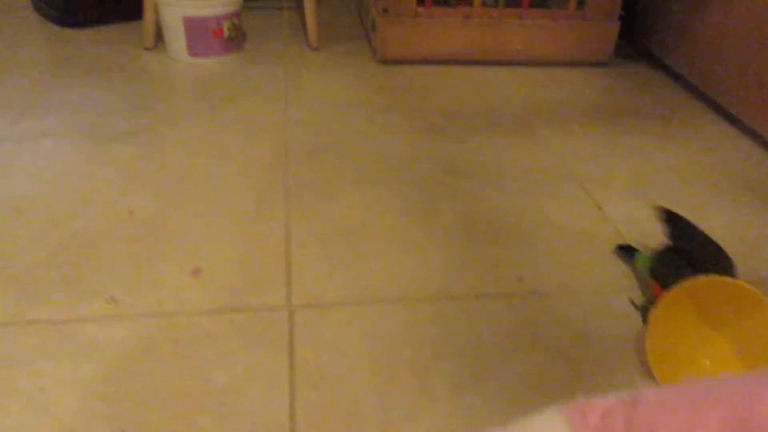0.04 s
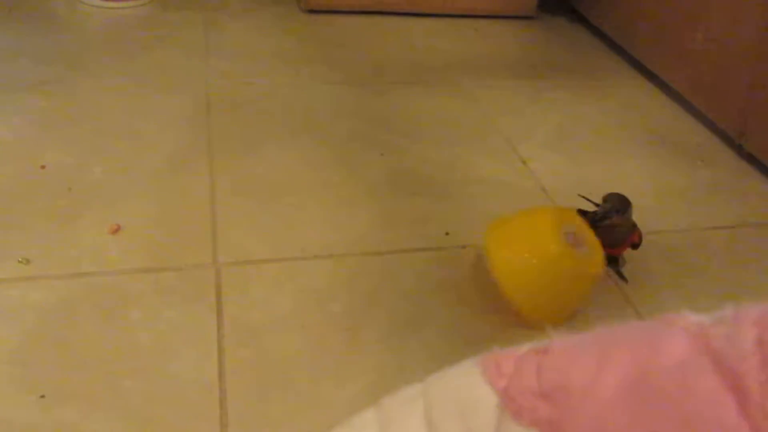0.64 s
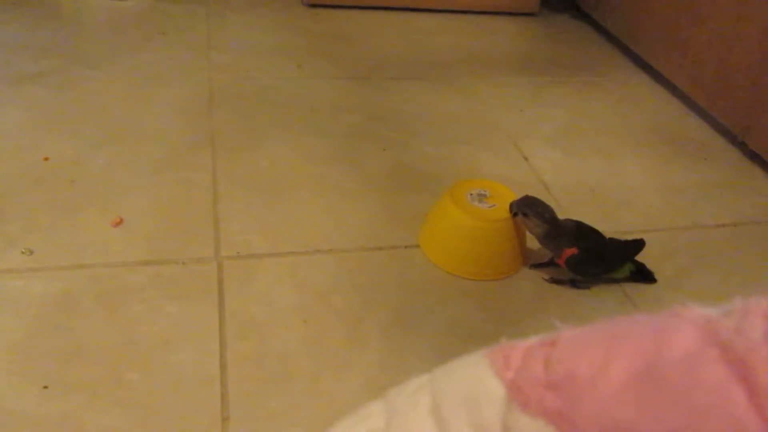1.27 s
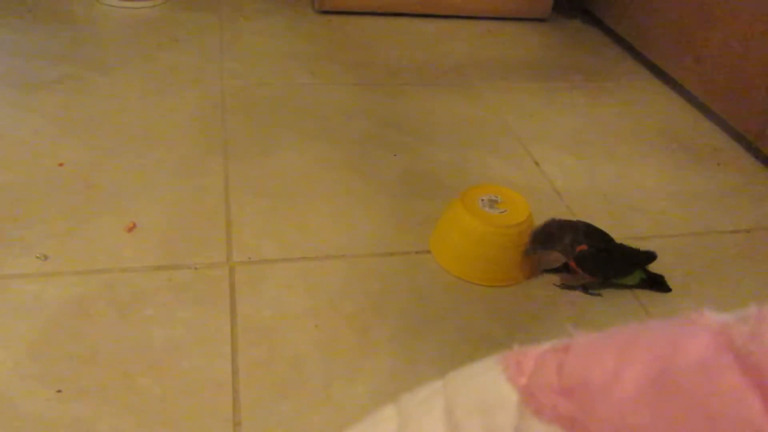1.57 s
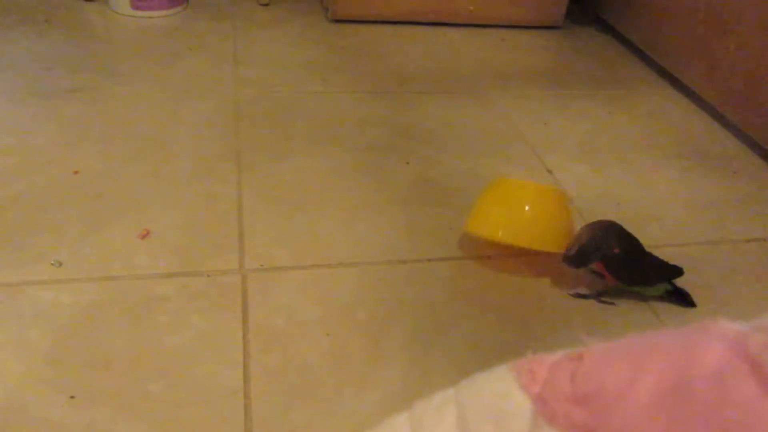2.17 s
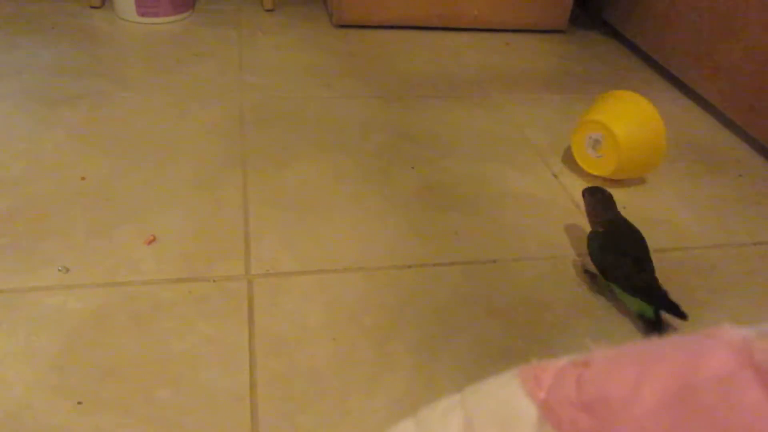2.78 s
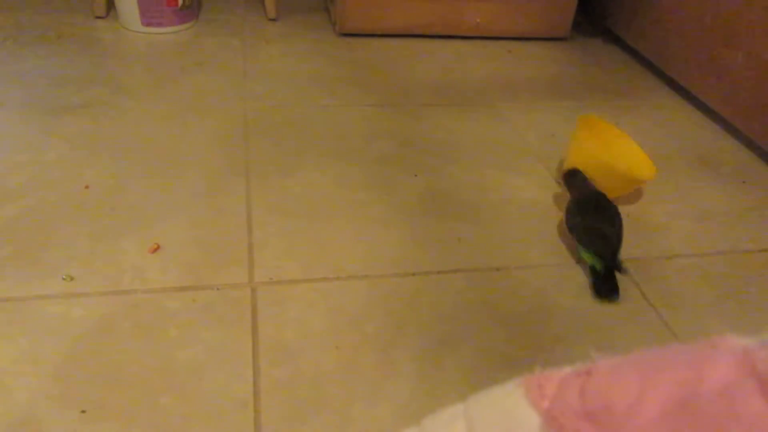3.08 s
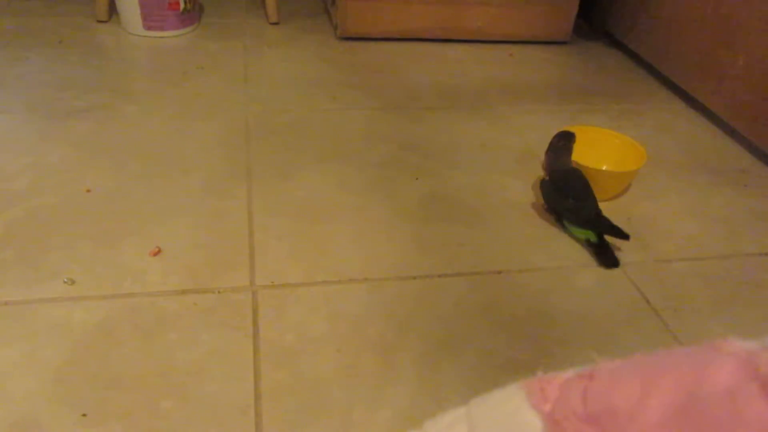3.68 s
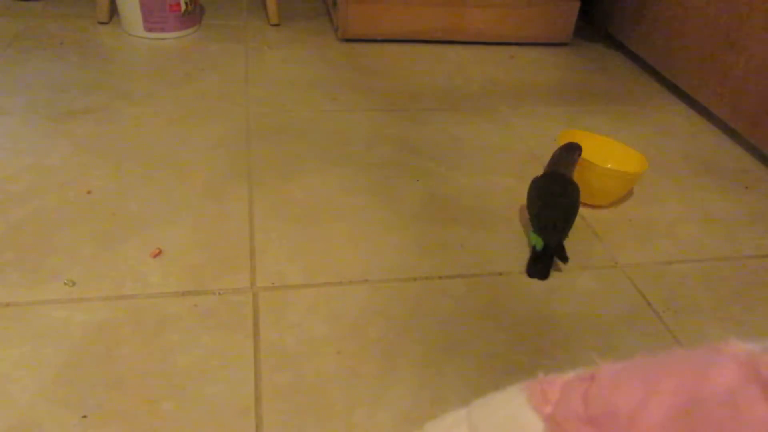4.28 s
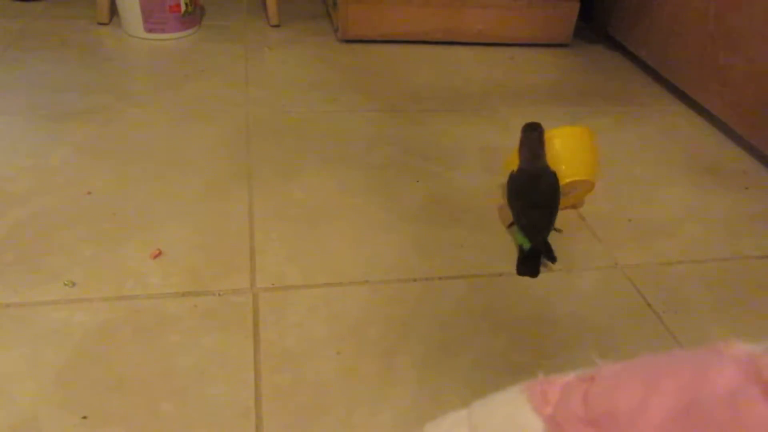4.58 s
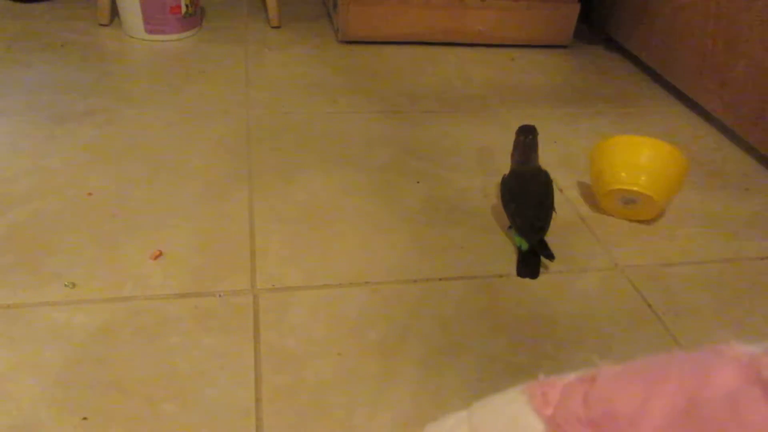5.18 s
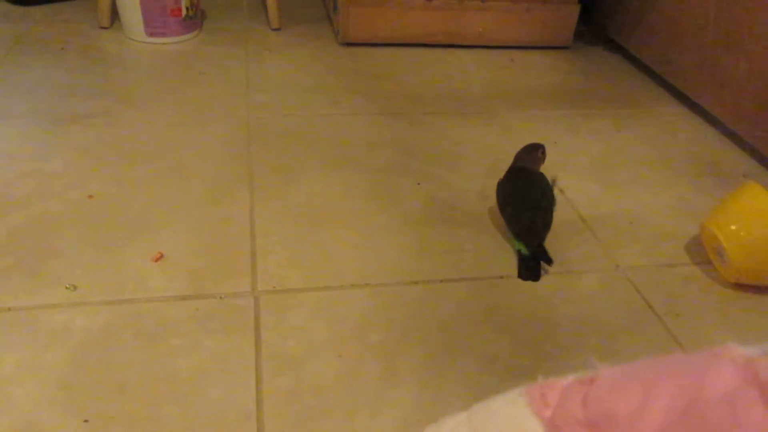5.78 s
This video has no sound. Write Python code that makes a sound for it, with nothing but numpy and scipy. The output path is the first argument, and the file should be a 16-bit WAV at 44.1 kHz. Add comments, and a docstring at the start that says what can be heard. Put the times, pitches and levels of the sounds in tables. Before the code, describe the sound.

Hollow plastic knocks, rattles and short scrapes as a bowl is shoved and flipped across tiles indoors.

```python
"""A small room with a tiled floor: a parrot shoves and flips a plastic bowl, a metre or two away.
Each knock sounds the hollow (low rim down, higher with the mouth open), rings the thin wall and
clicks on the tile. Between knocks the bowl slides, scuffs and ticks. The room adds a short echo
and a low hush; the hardest knocks overload a small microphone."""
import sys
import numpy as np
from scipy import signal
from scipy.fft import rfft, irfft
from scipy.io import wavfile
from scipy.ndimage import uniform_filter1d

SR = 44100
rng = np.random.default_rng(int(sys.argv[2]) if len(sys.argv) > 2 else 0)


def inscribe(sig):
    """Save sig as 16-bit PCM at rate SR to the path in sys.argv[1].

    A 1-D sig is mono; a 2-D sig holds one channel per row.
    Samples are clipped to [-1, 1] before scaling.
    """
    pcm = np.round(np.clip(np.atleast_2d(sig).T, -1, 1) * 32767)
    wavfile.write(sys.argv[1], SR, pcm.astype(np.int16))


N = 266231
TIME_S = np.arange(N) / SR
AGE_S = np.arange(int(.12 * SR)) / SR   # time since a blow
FALLS_S, FLIPPED_S = .75, 2.15   # bowl on its side, then rim down, then mouth up
MODE_SPREAD_DB = 2.5   # mode strength varies with the spot struck

# Slow wall bending. Each row: frequency in Hz, level mouth open in dB, level rim down in dB, t60 in s.
FLEX_MODES = [(1153, 12.5, 2, 0.023), (1282, 10, 3, 0.018), (1400, 4.5, -8.5, 0.022),
              (1620, -27, -15, 0.079), (1770, -34, 2, 0.055), (1847, -5.5, 1, 0.032),
              (2020, -15, -5, 0.047)]
# Fast modes of wall and rim. Each row: as in FLEX_MODES.
RING_MODES = [(2470, -24, 3.5, 0.035), (2414, -1.5, -4.5, 0.015), (2748, -5, 4.5, 0.031),
              (2948, 1, 6.5, 0.024), (3108, 0.5, -7, 0.033), (3294, -1.5, -9, 0.019),
              (3490, -2, -10, 0.013), (3690, -20, -22.5, 0.055), (4180, -10, -10, 0.034),
              (4350, -30, -29, 0.02)]
# Hard plastic touching tile. Each row: frequency in Hz, relative density in dB.
CLICK_SPECTRUM = [(300, -17), (1500, -9), (2500, -4.5), (4500, -5.5), (5800, 0.5), (7000, -3), (8400, -3.5),
                  (9700, -9), (12000, -9), (15500, -14)]


def from_db(db):
    """Decibels to gain."""
    return 10 ** (np.asarray(db) / 20)


def rms_one(x):
    """Scale to rms 1."""
    return x / np.sqrt(np.mean(x ** 2) + 1e-20)


def attack_one(x):
    """Scale to rms 1 over the first 5 ms."""
    return x / np.sqrt(np.mean(x[:int(.005 * SR)] ** 2) + 1e-20)


def gain_curve(points):
    """Gain per sample from (s, dB) points."""
    return from_db(np.interp(TIME_S, *np.transpose(points)))


def at_hz(points, hz):
    """Read a table on a log-frequency axis."""
    point_hz, value = np.transpose(points)
    return np.interp(np.log(np.maximum(hz, 1)), np.log(point_hz), value)


def band(x, low_hz, high_hz):
    """Causal band-pass."""
    return signal.sosfilt(signal.butter(2, [low_hz, high_hz], "band", fs=SR, output="sos"), x)


def low_cut(x, hz, order=2):
    """Causal high-pass."""
    return signal.sosfilt(signal.butter(order, hz, "high", fs=SR, output="sos"), x)


def high_cut(x, hz, order=6):
    """Causal low-pass."""
    return signal.sosfilt(signal.butter(order, hz, fs=SR, output="sos"), x)


def coloured_noise(spectrum):
    """Steady noise of a given spectrum, rms 1."""
    hz = np.arange(N // 2 + 1) * SR / N
    return rms_one(irfft(rfft(rng.standard_normal(N)) * from_db(at_hz(spectrum, hz)), N))


def add(out, start_s, sound):
    """Mix a sound in at start_s."""
    at = int(start_s * SR)
    out[at:at + len(sound)] += sound[:N - at]


def hush():
    """Low background noise; sinks at the loudest knocks and creeps back."""
    # Each row: frequency in Hz, relative density in dB.
    spectrum = [(15, -55), (25, -9.5), (81, -9), (109, -9), (231, 1), (344, -1), (415, -1.5), (604, 0),
                (691, -7.5), (856, -3.5), (927, -10.5), (1580, -15), (3350, -25.5), (9520, -34.5),
                (15000, -45)]
    # Each row: time in seconds, level in dB.
    levels = [(0, -43), (.75, -41.5), (.79, -58), (1.35, -51.5), (2.48, -46), (2.52, -49.5), (3.2, -47),
              (3.25, -53), (3.9, -49.5), (4.8, -45.5), (5.5, -42.5), (6.04, -41)]
    return gain_curve(levels) * coloured_noise(spectrum)


def room_echo(x, first_echo_s=.0028, build_s=.0025, early_db=3, early_s=.0057):
    """Strong early echoes off floor and cupboard, then a dense tail whose treble dies first."""
    # Room decay. Each row: frequency in Hz, t60 in seconds.
    decay = [(200, 0.53), (600, 0.51), (1000, 0.48), (3000, 0.43), (6000, 0.24), (14000, 0.27)]
    # Echo colour. Each row: frequency in Hz, gain in dB.
    colour = [(150, -3), (500, 0), (850, 0.5), (1300, -2.5), (3000, 1), (6000, -5), (9000, -5), (15000, -9)]
    # Echo level over time; the loudest knocks sound driest. Each row: time in seconds, send in dB.
    send = [(0, -9.5), (.7, -5), (.76, -15), (1.1, -5), (2.2, -5.5), (2.5, -8.5), (2.65, -8.5), (3.25, -9),
            (3.7, -7.5), (6, -7)]
    t = np.arange(int(.6 * SR)) / SR
    edges_hz = np.geomspace(100, 16000, 12)
    onset = 1 - np.exp(-np.maximum(t - first_echo_s, 0) / build_s)
    response = np.zeros(len(t))
    for low, high in zip(edges_hz, edges_hz[1:]):
        hz = np.sqrt(low * high)
        tail = band(rng.standard_normal(len(t)), low, high) * onset * from_db(-60 * t / at_hz(decay, hz))
        unity_rms = np.sqrt(2 * (high - low) / SR / len(t))
        response += rms_one(tail) * unity_rms * from_db(at_hz(colour, hz))
    response *= 1 + from_db(early_db) * np.exp(-t / early_s)
    return signal.fftconvolve(x * gain_curve(send), response)[:N]


def wall_modes(modes, rim_down, detune=.013):
    """One blow on the wall: the spot struck sets each mode's strength, the tile shifts its pitch."""
    hz, open_db, down_db, t60_s = np.transpose(modes)[:, :, None]
    strength, shift, side = rng.standard_normal((3, len(modes), 1))
    level_db = (down_db if rim_down else open_db) + MODE_SPREAD_DB * strength
    envelope = np.sign(side) * from_db(level_db - 60 * AGE_S / t60_s)
    return attack_one(np.sum(envelope * np.sin(2 * np.pi * hz * (1 + detune * shift) * AGE_S), axis=0))


def crack(low_hz, high_hz, t60_s):
    """Many overdamped modes of the plastic: a brief noise burst."""
    burst = rng.standard_normal(len(AGE_S)) * from_db(-60 * AGE_S / t60_s)
    return attack_one(band(burst, low_hz, high_hz))


def shell(rim_down, flex_db, ring_db):
    """The struck thin wall bends slowly and rings fast."""
    low_hz, high_hz = (650, 2480) if rim_down else (700, 1780)
    flex = wall_modes(FLEX_MODES, rim_down) + 1.18 * crack(735, 2000, t60_s=.022)
    flex = high_cut(low_cut(flex, low_hz), high_hz)
    ring = wall_modes(RING_MODES, rim_down) + .65 * crack(2680, 4060, t60_s=.028)
    return from_db(flex_db) * attack_one(flex) + from_db(ring_db) * attack_one(band(ring, 1670, 12000))


def open_hollow(hz, t60_s, reach_octaves=.46, detune=.027):
    """Mouth open, a blow starts all base modes in step, strongest near hz."""
    # Modes of base and hollow. Each row: frequency in Hz, level in dB, ring time as a multiple of t60_s.
    modes = [(334, -12.5, 0.45), (430, -11, 0.2), (516.95, 1, 0.93), (598.4, 6, 1.56), (684, 0, 1),
             (812, 5.5, 0.67), (927, 4.5, 1.4), (982, -2.5, 1.24), (1145, -1.5, 2.1)]
    mode_hz, level_db, t60_ratio = np.transpose(modes)[:, :, None]
    strength, shift = rng.standard_normal((2, len(modes), 1))
    distance = np.log2(mode_hz / hz) / reach_octaves
    weight = from_db(level_db + MODE_SPREAD_DB * strength) / (1 + distance ** 2) ** 2
    envelope = weight * from_db(-60 * AGE_S / (t60_s * t60_ratio))
    rings = envelope * np.sin(2 * np.pi * mode_hz * (1 + detune * shift) * AGE_S)
    return attack_one(band(rings.sum(axis=0), .53 * hz, 1800))


def trapped_air(hz, t60_s, rise_s=.0009, glide=.026, glide_s=.0051):
    """Rim down, the air under the bowl rings like a drum; the changing rim gap bends its pitch."""
    pitch_hz = hz * (1 + glide * (2 * np.exp(-AGE_S / glide_s) - 1))
    envelope = from_db(-60 * AGE_S / t60_s) * (1 - np.exp(-AGE_S / rise_s))
    ring = attack_one(envelope * np.sin(2 * np.pi * np.cumsum(pitch_hz) / SR))
    thud = .22 * crack(.95 * hz, 1.7 * hz, t60_s=.014)
    return attack_one(low_cut(ring + thud, hz=290))   # a small body radiates little bass


def tile_click(grain, start_s, click_db, wall_db, edge_hz=11000, db_per_octave=22):
    """Plastic meets tile; a hard touch, where the click outweighs the wall, is brighter."""
    cut_hz = np.clip(edge_hz * 2 ** ((click_db - wall_db) / db_per_octave), 3500, 16000)
    envelope = from_db(-60 * AGE_S / .006) + .27 * from_db(-60 * AGE_S / .044)
    burst = grain[int(start_s * SR):][:len(AGE_S)] * envelope
    return from_db(click_db) * attack_one(high_cut(burst, cut_hz, order=2))


def scuffs():
    """The rim scuffs the tile: brief swells of friction hiss."""
    # Each row: start in seconds, length in seconds, level in dB, centre in Hz, width in octaves.
    swells = [(0.076, 0.027, -48.5, 10900, 0.82), (0.109, 0.046, -47, 3260, 0.32),
              (0.219, 0.08, -42.5, 3280, 0.31), (0.259, 0.044, -36, 3630, 0.7), (.262, 0.061, -49, 6900, 1),
              (0.4, .02, -55, 8000, 0.98), (1.865, 0.044, -65, 7350, 0.56),
              (2.475, 0.0086, -39, 8000, 0.83), (2.715, .02, -38.5, 7514, 0.73),
              (2.927, 0.022, -43.5, 4000, 1.43), (4.962, 0.024, -46.5, 5936, 0.73)]
    out = np.zeros(N)
    for start_s, length_s, level_db, hz, octaves in swells:
        size, edge_ratio = int(length_s * SR), 2 ** (octaves / 2)
        hiss = rms_one(band(rng.standard_normal(size), hz / edge_ratio, hz * edge_ratio))
        envelope = np.sin(np.pi * np.linspace(0, 1, size) ** .35)
        add(out, start_s, from_db(level_db) * hiss * envelope)
    return out


def slides(catches_per_s=3500, spread_db=3.5, flex_db=-2, speed_power=1.27):
    """The rim catches on the tile's grain; tiny slips ring wall and base, and hiss."""
    # Each row: start, fastest moment and stop in seconds, then base, wall and grit at top speed in dB.
    shoves = [(-.1, .01, 0.26, -57, -48.5, -63), (.17, 0.268, 0.31, -60, -60, -51.5),
              (.27, 0.372, .66, -44.5, -53, -61), (.42, .68, 0.86, -50, -65, -70),
              (2, 2.157, 2.264, -40, -51, -61), (2.8, 2.871, 3, -65, -55, -60),
              (2.97, 3.036, 3.19, -37.5, -49.5, -70), (3.138, 3.21, 3.24, -51, -47.5, -61),
              (3.179, 3.37, 3.8, -44, -58.5, -80), (4.19, 4.386, 4.5, -48.5, -47, -55),
              (4.42, 4.529, 4.6, -40, -50, -59.5)]
    # Friction hiss. Each row: frequency in Hz, relative density in dB.
    grit_spectrum = [(2350, -30.5), (4000, -1.5), (6060, -6.5), (7190, -6.5), (9800, -12.5), (11300, -13),
                     (15000, -25)]
    catches = rng.random(N) < catches_per_s / SR
    slips = catches * rng.standard_normal(N) * from_db(spread_db * rng.standard_normal(N))
    responses = [wall_modes(modes, rim_down=False) for modes in (RING_MODES, FLEX_MODES)]
    responses.append(open_hollow(hz=630, t60_s=.017))
    ring, flex, base = (rms_one(signal.fftconvolve(slips, response)[:N]) for response in responses)
    # pressed against the tile, the wall is damped and its peaks widen
    ring = rms_one(.65 * ring + rms_one(band(slips, 2550, 3700)))
    flex = rms_one(flex + rms_one(band(slips, 840, 1220)))
    wall = low_cut(ring + from_db(flex_db) * flex, hz=714)
    roughness = np.sqrt(np.abs(uniform_filter1d(np.abs(slips), size=90)))
    grit = rms_one(coloured_noise(grit_spectrum) * roughness)
    out = np.zeros(N)
    for start_s, fastest_s, stop_s, base_db, wall_db, grit_db in shoves:
        speed = np.interp(TIME_S, [start_s, fastest_s, stop_s], [0, 1, 0])
        scrape = from_db(base_db) * base + from_db(wall_db) * wall + from_db(grit_db) * grit
        out += speed ** speed_power * scrape
    return out


def ticks():
    """Glancing touches of rim, beak and claw: wall and click only."""
    # Each row: start in seconds, then wall bending, wall ringing and click in dB.
    touches = [(0.197, -46, -45.5, -47), (0.568, -43, -43, -52), (0.606, -41.5, -41, -51),
               (0.638, -41, -42, -55), (0.705, -57, -43.5, -52), (0.999, -43, -36, -47),
               (1.805, -49.5, -48.5, -56.5), (1.9417, -55, -45.5, -59), (2.7483, -37, -32.5, -37.5),
               (2.794, -35.5, -35.5, -40.5), (2.8313, -40, -42, -51), (2.935, -52, -39.5, -54),
               (2.9631, -57, -40.5, -38), (3.083, -46, -65, -52), (3.1397, -52, -30.5, -37),
               (3.1612, -53, -33, -36), (3.494, -53, -41, -53), (4.031, -40.5, -41, -55),
               (4.9643, -66, -53.5, -45.5), (5.022, -70, -66, -55), (5.552, -63, -50, -45),
               (5.592, -68, -69, -49.5), (5.665, -57, -60, -50)]
    out, grain = np.zeros(N), coloured_noise(CLICK_SPECTRUM)
    for start_s, flex_db, ring_db, click_db in touches:
        rim_down = FALLS_S < start_s < FLIPPED_S
        add(out, start_s, shell(rim_down, flex_db, ring_db))
        add(out, start_s, tile_click(grain, start_s, click_db, ring_db))
    return out


def landing(start_s=2.503, level_db=-15):
    """After the flip the bowl comes down with one dead thud."""
    thud = attack_one(band(signal.unit_impulse(len(AGE_S)), 340, 950))
    out = np.zeros(N)
    add(out, start_s, from_db(level_db) * thud)
    return out


def blow(start_s, hollow_db, hz, wall_db, usual_db=-24, t60_halving_db=36):
    """Hollow and wall sound together, as the bowl's position allows; a hard blow dies sooner."""
    force_db = hollow_db - usual_db
    t60_scale = 2 ** (-force_db / t60_halving_db)
    rim_down = FALLS_S <= start_s < FLIPPED_S
    if start_s < FALLS_S:   # on its side
        hollow = open_hollow(hz, t60_s=.025 * t60_scale)
        flex_db = hollow_db - 20
    elif rim_down:   # the tile holds the rim
        hollow = trapped_air(hz, t60_s=.04 * t60_scale)
        flex_db = wall_db - 1
    else:   # mouth up: hard or high-pitched blows bend the wall more
        hollow = open_hollow(hz, t60_s=.042 * t60_scale)
        flex_db = hollow_db - 7.5 + .12 * force_db + 6 * np.log2(hz / 800)
    return from_db(hollow_db) * hollow + shell(rim_down, flex_db, wall_db)


def knocks(bounce_blows=3, hollow_loss_db=3.5, edge_loss_db=7):
    """The bowl strikes the tile; on each rebound wall and click lose more than the hollow."""
    # Each row: start in seconds, hollow in dB, hollow pitch in Hz, wall in dB, click in dB,
    # rebound gap in seconds (0 for a single blow).
    strikes = [(0.027, -27.5, 770, -48, -68, 0.00041), (0.0688, -27.5, 750, -34.5, -47, 0),
               (0.105, -32.5, 615, -30.5, -42, 0), (0.299, -26.5, 640, -38, -48, 0.00056),
               (0.32, -32, 600, -33.5, -64, 0.00073), (0.346, -29.5, 600, -43, -67, 0),
               (0.36, -29, 554, -43, -67, 0.015), (0.393, -34, 600, -40.5, -43, 0.00035),
               (0.424, -30, 515, -35.5, -40, 0.008), (0.7628, -4.2, 562.5, -42, -52, 0),
               (0.7727, -7.5, 545, -15, -23, 0), (0.776, -7.5, 565, -32, -57, 0.00048),
               (0.9414, -16, 487, -32, -46, 0), (0.9459, -22, 513, -28, -60, .0032),
               (0.9815, -20, 537, -55, -68, 0), (1.034, -12.5, 499, -24, -40.5, 0),
               (1.0367, -19.5, 450, -27.5, -53, 0.00042), (1.068, -32, 405, -48, -70, .013),
               (1.835, -36, 429.7, -60, -77, 0.00047), (1.875, -35.5, 415, -64, -66, 0.0091),
               (1.891, -28, 460, -67, -63, 0), (1.931, -29, 488, -66, -75, 0),
               (1.954, -38, 480, -66, -74, .008), (2.212, -21.5, 600, -39.5, -73, 0.0051),
               (2.229, -23.5, 724, -50, -72.5, 0.00032), (2.476, -35, 800, -30.5, -30, 0),
               (2.481, -28, 695, -42, -39, 0), (2.503, -25, 799.5, -25.5, -35, 0),
               (2.5886, -13.5, 770, -18, -30, 0), (2.6172, -19, 751, -25, -41.5, 0.0049),
               (2.639, -20.5, 790, -29, -44, 0.00017), (2.6772, -24, 810, -34, -49, 0),
               (2.7159, -27.5, 760, -33.5, -34.5, 0.014), (3.001, -37, 724, -39, -61, 0),
               (3.022, -32, 910, -45, -54, 0), (3.042, -30, 890, -44, -70, .018),
               (3.216, -25.5, 890, -46, -61, 0.0036), (3.2261, -13.5, 990, -19.5, -34, 0.00022),
               (3.2425, -22, 899.6, -46, -53, 0.018), (3.3595, -24, 980, -36, -50, 0.013),
               (3.4616, -25.5, 930.6, -36, -58, 0.012), (3.5277, -24, 960, -37.5, -56, 0.0053),
               (3.577, -26.5, 940.7, -36, -72, 0.0025), (3.614, -29, 900.6, -55, -78, 0),
               (3.629, -26, 964.8, -42, -68, 0.00064), (3.654, -22.5, 959, -34.5, -55, 0.0096),
               (3.965, -30, 875, -41, -57, 0.022), (4.426, -35, 900, -41, -60, 0.00048),
               (4.445, -33, 720, -40, -64, .018), (4.483, -27, 690, -37.5, -58, 0),
               (4.507, -29, 630, -37.5, -72, 0.00067), (5.742, -32.5, 550, -46.5, -50.5, 0.00096)]
    out, grain = np.zeros(N), coloured_noise(CLICK_SPECTRUM)
    for start_s, hollow_db, hz, wall_db, click_db, gap_s in strikes:
        for k in range(bounce_blows if gap_s > 0 else 1):
            at_s, softer_db = start_s + k * gap_s, k * edge_loss_db
            add(out, at_s, blow(at_s, hollow_db - k * hollow_loss_db, hz, wall_db - softer_db))
            add(out, at_s, tile_click(grain, at_s, click_db - softer_db, wall_db - softer_db))
    return out


def scene():
    """Bowl, room echo and background, mono."""
    bowl = knocks() + landing() + ticks() + slides() + scuffs()
    return (bowl + room_echo(bowl) + hush())[None]


def record(dry, cutoff_hz=15500):
    """The small microphone thins the deepest bass and clips the hardest knocks; the top is cut."""
    clipped = np.clip(low_cut(dry, hz=25, order=1), -1, 1)
    return signal.sosfilt(signal.ellip(10, .1, 80, cutoff_hz, fs=SR, output="sos"), clipped)


dry = scene()
out = record(dry)
inscribe(out)
```